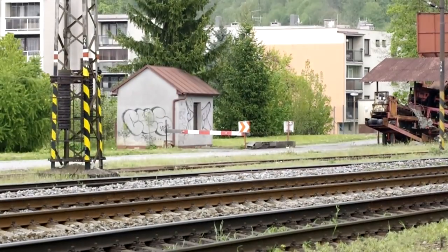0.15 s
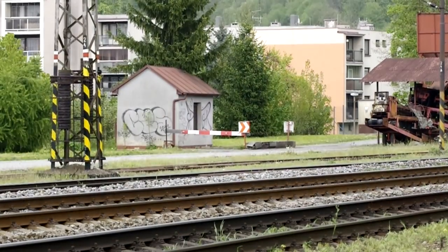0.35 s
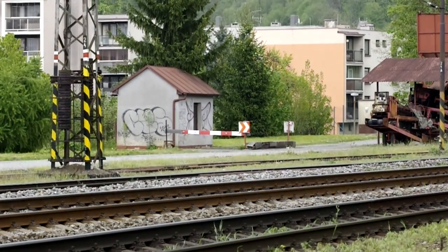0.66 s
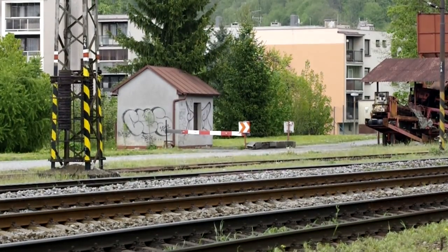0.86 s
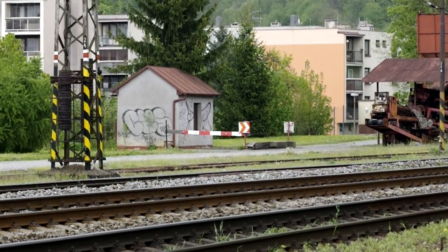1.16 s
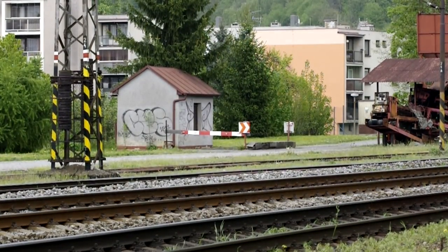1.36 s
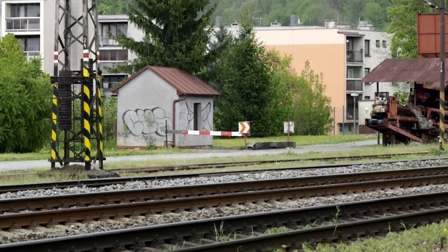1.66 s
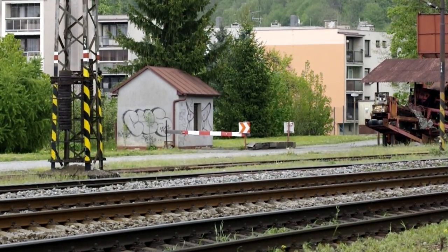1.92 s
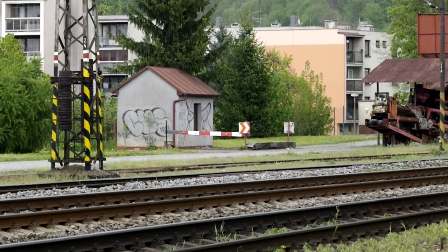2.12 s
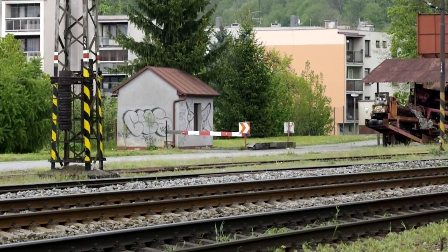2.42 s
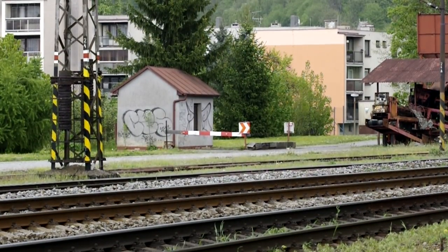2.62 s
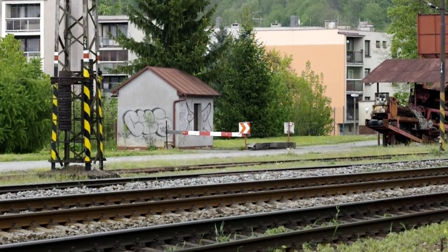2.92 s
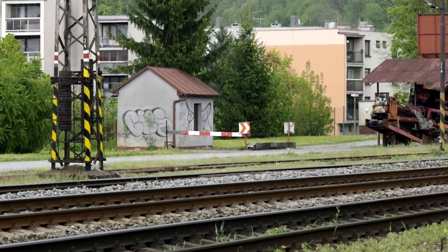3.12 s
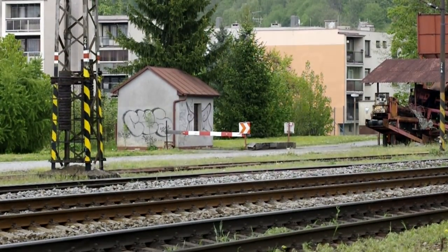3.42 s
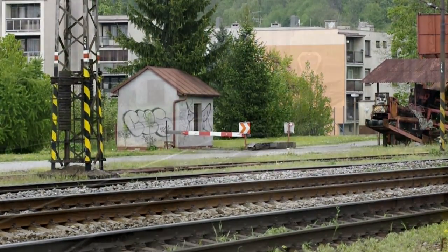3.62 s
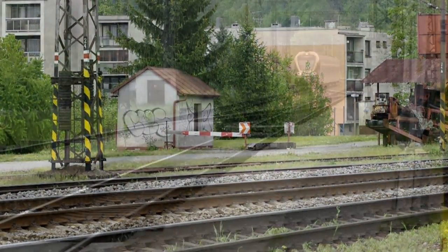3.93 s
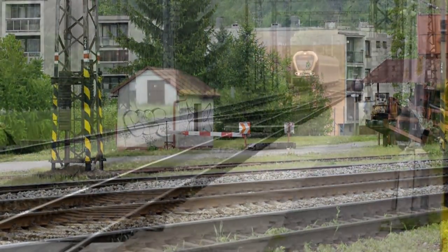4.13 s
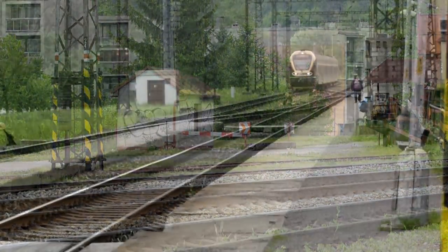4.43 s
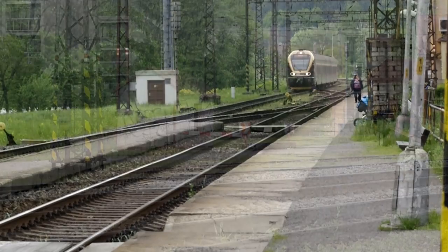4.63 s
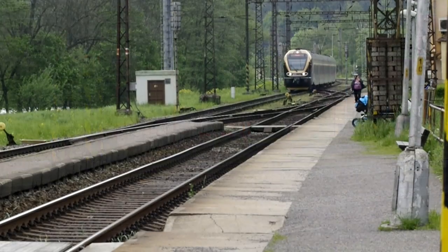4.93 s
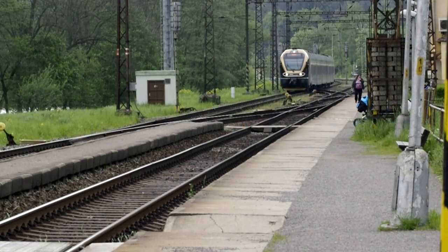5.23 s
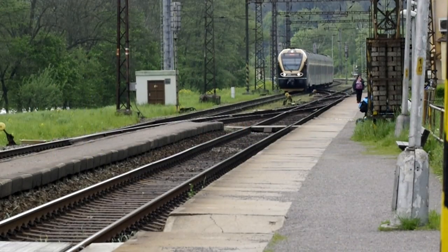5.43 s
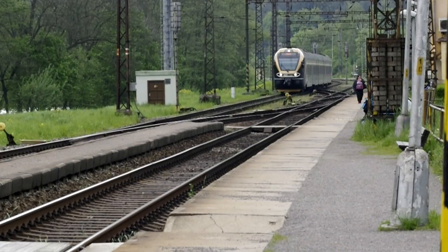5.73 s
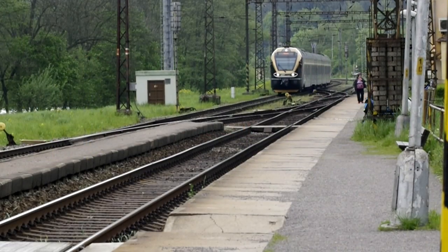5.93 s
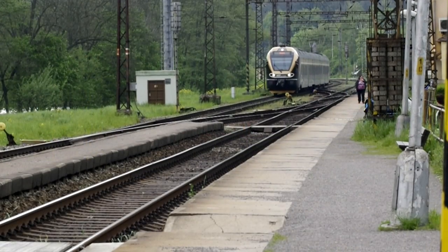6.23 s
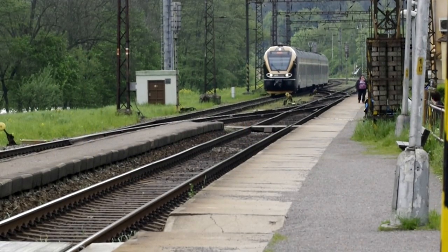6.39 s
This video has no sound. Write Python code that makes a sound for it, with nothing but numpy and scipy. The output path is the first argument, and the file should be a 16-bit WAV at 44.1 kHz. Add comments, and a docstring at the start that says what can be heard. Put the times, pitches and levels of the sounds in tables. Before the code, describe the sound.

Outdoors beside railway tracks, a fast train that has just passed draws away with a rolling roar and rushing air. Over it the rails give a bright, metallic hiss in uneven surges, with light knocks. The roar goes first and the thin ringing lingers, then vanishes. Wind gusts thump low on the exposed microphone, hardest near the end, leaving quiet air.

```python
"""The rolling roar of a fast electric train that has just rushed by recedes under the high ringing hiss of the rails,
which surges as wheel after wheel scrubs the steel. The hiss fades into quiet open air with a few faint birds,
and gusts of wind thump on the microphone. Shaped noise makes roar, air, hiss and wind; resonances ring in the rails;
sines make drones and birds; single swings of pressure make the thumps."""
import sys
import numpy as np
from scipy import signal
from scipy.fft import rfft, irfft, next_fast_len
from scipy.io import wavfile
from scipy.ndimage import uniform_filter1d

SR = 44100
rng = np.random.default_rng(int(sys.argv[2]) if len(sys.argv) > 2 else 0)


def unload_wav(signal):
    """Save mono or channel-first audio to the path in sys.argv[1] as 16-bit WAV at rate SR, clipped to [-1, 1]."""
    wavfile.write(
        sys.argv[1],
        SR,
        np.round(np.clip(np.atleast_2d(signal).T, -1, 1) * 32767).astype(np.int16),
    )


N = 289296
T, HZ = np.arange(N) / SR, np.fft.rfftfreq(N, 1 / SR)

# gusts on the microphone: middle_s, half_length_s, strength_db
GUSTS = [(2.732, 0.025, -45.5), (2.832, 0.014, -38), (2.977, 0.029, -31.5), (3.043, .025, -37),
         (3.141, 0.027, -40), (3.3, 0.085, -49), (3.425, 0.043, -43), (4.37, 0.018, -47),
         (4.55, 0.029, -30.5), (4.664, 0.054, -36), (4.828, 0.033, -33), (4.965, 0.076, -25.5),
         (5.123, .06, -17.5), (5.245, 0.048, -19.5), (5.348, 0.02, -27.5), (5.392, 0.023, -35),
         (5.824, 0.053, -36.5), (5.911, 0.012, -43.5)]


def gain_of(db):
    """Decibels to amplitude."""
    return 10 ** (np.asarray(db) / 20)


def evened(x):
    """Scales to rms 1."""
    return x / np.sqrt(np.mean(x ** 2) + 1e-20)


def shape(points):
    """Gain at every frequency from a short spectrum; it falls steeply above the last point."""
    hz, db = np.transpose(points)
    gain = gain_of(np.interp(np.log(HZ + 1), np.log(hz), db))
    return gain / np.maximum(HZ / hz[-1], 1) ** 10


def ringing(modes):
    """Gain at every frequency of a set of steep-sided resonances, summed in power."""
    power = 0
    for hz, width_hz, db in modes:
        power = power + gain_of(db) ** 2 / (1 + ((HZ - hz) / width_hz) ** 2) ** 2
    return np.sqrt(power)


def slow_gain(rate_hz):
    """Low-pass gain for slow random movement."""
    return 1 / (1 + (HZ / rate_hz) ** 4)


def noise(gain, band_hz=(0, SR)):
    """Noise of a given colour, with rms 1 inside the band."""
    size = next_fast_len(N)
    colour = np.interp(np.fft.rfftfreq(size, 1 / SR), HZ, gain)
    x = irfft(rfft(rng.standard_normal(size)) * colour, size)[:N]
    inside = (HZ >= band_hz[0]) & (HZ <= band_hz[1])
    return evened(x) * np.sqrt(np.sum(gain ** 2) / np.sum(gain[inside] ** 2))


def waver(rate_hz, depth_db):
    """A random gain that moves up to rate_hz times a second."""
    return gain_of(depth_db * noise(slow_gain(rate_hz)))


def level(curve, fall_db_per_s, column=1):
    """Gain along one column of a curve; outside its span it dies away at a steady rate."""
    s, db = np.transpose(curve)[[0, column]]
    outside_s = abs(T - np.clip(T, s[0], s[-1]))
    return gain_of(np.interp(T, s, db) - fall_db_per_s * outside_s)


def swell(middle_s, half_s):
    """A round-topped rise and fall, height 1."""
    return np.exp(-abs((T - middle_s) / half_s) ** 3)


def mottled(x, depth_db, span_hz, span_s):
    """Lays random patches of gain, span_hz wide and span_s long, over a sound."""
    hz, t, z = signal.stft(x, SR, nperseg=1024, noverlap=768)
    across = np.fft.fftfreq(len(hz), hz[1])[:, None]
    along = np.fft.fftfreq(len(t), t[1])
    blur = np.exp(-(across * span_hz) ** 2 - (along * span_s) ** 2)
    grain = np.fft.fft2(rng.standard_normal(z.shape))
    patches = evened(np.fft.ifft2(grain * blur).real)
    return signal.istft(z * evened(gain_of(depth_db * patches)), SR, nperseg=1024, noverlap=768)[1][:N]


def open_air():
    """Outdoor wash; a far train murmurs as it draws near and makes the rails hiss faintly."""
    # wash: freq_hz, db_per_hz
    wash_tone = [(15, -12), (40, -5), (110, 0.5), (200, -1), (300, -6.5), (480, -3.5), (700, -9),
                 (900, -8.5), (1400, -12), (2100, -15.5), (2800, -17), (5300, -19), (6700, -24),
                 (9500, -28), (15500, -45)]
    # rails under the distant train: freq_hz, width_hz, level_db
    far_rail_modes = [(5750, 340, -1.3), (8260, 970, 0.25)]
    # murmur of the distant train: time_s, level_db
    approach = [(5.3, -58.5), (5.9, -55), (6.5, -55.5)]
    # its resonances: freq_hz, width_hz, level_db
    approach_modes = [(209, 92, -0.5), (470, 150, 3.5), (870, 220, -4.5), (2000, 780, -12.5)]
    wash_db, far_rail_db = -52, -62
    wash = gain_of(wash_db) * mottled(noise(shape(wash_tone)), depth_db=1.04, span_hz=199, span_s=0.19)
    murmur = level(approach, fall_db_per_s=10) * noise(ringing(approach_modes)) * waver(9, 1.4)
    far_hiss = gain_of(far_rail_db) * noise(ringing(far_rail_modes))
    return wash + murmur + far_hiss


def birds():
    """Short gliding notes, blurred by scattering among the trees."""
    # middle_s, length_s, pitch_hz, glide_hz_per_s, level_before_blur_db
    chirps = [(0.468, 0.032, 2600, 0, -39), (2.366, 0.05, 2880, -2, -52), (3.427, 0.031, 3000, 4000, -54),
              (4.024, 0.051, 3600, 5000, -51), (6.27, 0.023, 4080, -2000, -59.5)]
    notes = np.zeros(N)
    for s, length_s, hz, glide, db in chirps:
        t = T - s
        envelope = np.exp(-(t / length_s) ** 2)
        notes += gain_of(db) * envelope * np.sin(2 * np.pi * (hz + glide * t / 2) * t)
    return notes * (0.5 + 0.44 * noise(slow_gain(70)))


def gusting():
    """Strength of the wind at the microphone, 0-1; it saturates in the hardest gusts."""
    full_db = -25
    power = sum((gain_of(db) * swell(s, half_s)) ** 2 for s, half_s, db in GUSTS)
    return np.tanh(np.sqrt(power) / gain_of(full_db))


def wind(gust):
    """Turbulence rumbles at the microphone; stronger gusts shed smaller eddies, which flutter higher."""
    # light breeze between the gusts: time_s, level_db
    breeze = [(0.0, -53), (0.68, -56), (0.8, -45.5), (1.65, -56.5), (1.85, -47.5), (2.3, -52),
              (3.65, -48.5), (4.0, -59), (4.13, -46.5), (5.5, -62), (6.1, -58.5), (6.55, -53)]
    # deep rumble: freq_hz, db_per_hz
    rumble_tone = [(15, -2), (45, 3), (70, 2.5), (100, -6), (170, -17.5)]
    # buffeting: freq_hz, db_per_hz
    buffet_tone = [(40, -13), (80, -8.5), (125, 7.5), (165, -7.5), (230, -10.5), (400, -30.5), (900, -56)]
    # flutter: freq_hz, db_per_hz
    flutter_tone = [(100, -6), (200, 7.5), (340, -1), (480, -8.5), (700, -25), (1200, -54), (3000, -62)]
    # a gust's rumble lasts longer and grows less than the gust
    rumble_db, rumble_spread, rumble_growth = -25.5, 2, 0.43
    push_power = 0
    for s, half_s, db in GUSTS:
        push = gain_of(rumble_db + rumble_growth * db) * swell(s, rumble_spread * half_s)
        push_power = push_power + push ** 2
    drive = np.sqrt(level(breeze, fall_db_per_s=9) ** 2 + push_power)
    rumble = drive * noise(shape(rumble_tone)) * waver(13, 1.6)
    buffet = gain_of(-24.0) * gust * noise(shape(buffet_tone)) * waver(22, 1.4)
    flutter = gain_of(-27.0) * gust ** 1.53 * noise(shape(flutter_tone)) * waver(70, 1.8)
    return rumble + buffet + flutter


def small_eddies(gust):
    """Random eddies, as strong as the gust that carries them: rows of middle_s, peak_db, pitch_hz."""
    count, eddies_per_s = 600, 41
    full_gust_db, spread_db = -31.5, 2
    mid_hz, spread_oct = 298, 0.29
    at, chance = rng.integers(0, N, count), rng.random(count)
    size, pitch = rng.standard_normal((count, 2)).T
    db = full_gust_db + spread_db * size + 20 * np.log10(gust[at] + 1e-9)
    rows = np.transpose([T[at], db, mid_hz * 2 ** (spread_oct * pitch)])
    return rows[chance < eddies_per_s * T[-1] / count]  # thins the candidates to the rate


def thumps(eddies):
    """An eddy crossing the microphone pulls and then pushes: one swing of pressure, shorter when it is small."""
    out = np.zeros(N)
    for s, db, hz in eddies:
        near = slice(*np.searchsorted(T, [s - 1 / hz, s + 1 / hz]))
        u = 2 * np.pi * hz * (T[near] - s)
        out[near] += gain_of(db) * u * np.exp((1 - u ** 2) / 2)
    return out


def knocks():
    """Light knocks from the receding running gear, each a short, broad ring smeared by distance."""
    # start_s, level_db, pitch_hz
    knock_rows = [(1.39, -44, 1200), (2.47, -48.5, 1060), (2.59, -50.5, 1800), (2.88, -49, 1280),
                  (3.41, -52.5, 2650)]
    decay_s = 0.017
    out = np.zeros(N)
    for s, db, hz in knock_rows:
        age = np.maximum(T - s, 0) / decay_s
        envelope = np.sqrt(2 * age) * np.exp(0.5 - age)  # height 1
        out += gain_of(db) * envelope * noise(ringing([(hz, hz / 4, 0)]))
    return out


def drones():
    """Tones of running gear and drive: each swells and fades as it goes by, wandering a little in pitch."""
    # middle_s, length_s, pitch_hz, width_hz, level_db
    drone_rows = [(0.18, 0.34, 266, 13, -51.5), (0.976, 0.27, 264, 10.7, -44.5), (1.07, .17, 377, 4, -40.5),
                  (1.7, .22, 452, 30, -48.5), (1.56, 0.069, 3450, 52, -47)]
    out = np.zeros(N)
    for s, length_s, hz, width_hz, db in drone_rows:
        pitch_hz = hz + width_hz / 2 * noise(slow_gain(width_hz))
        tone = evened(np.sin(2 * np.pi * np.cumsum(pitch_hz) / SR))
        out += gain_of(db) * np.exp(-((T - s) / length_s) ** 2) * tone
    return out


def coaches():
    """Roar of wheels and sleepers and air rushing along the coaches, both receding with the train."""
    # roar: time_s, level_db
    roar_curve = [(0.0, -45), (0.23, -39.5), (0.6, -41), (0.65, -46), (0.92, -37), (1.09, -40.5),
                  (1.9, -46), (1.94, -48), (2.85, -52.5)]
    # roar: freq_hz, db_per_hz
    roar_tone = [(20, -22), (55, -13), (100, -5.5), (165, -7.5), (270, -1.5), (400, -2), (520, -0.5),
                 (820, 1.5), (1020, 0), (1350, -8), (2500, -17.5)]
    # rushing air: time_s, level_db
    rush_curve = [(0.0, -41), (0.73, -41.5), (0.95, -37.5), (1.11, -46), (1.32, -44), (1.42, -53.5),
                  (2.85, -53.5)]
    # rushing air: freq_hz, db_per_hz
    rush_tone = [(700, -8.5), (1500, -3), (2500, -2.5), (3300, -1.5), (4800, 1), (6000, 4.5), (9000, -33)]
    burst_s, burst_half_s, burst_db = 1.54, 0.071, -41  # one short, harsh burst in the rush
    roar = mottled(noise(shape(roar_tone), (400, 1300)), depth_db=2.0, span_hz=120, span_s=0.16)
    roar *= level(roar_curve, fall_db_per_s=5.5) * waver(20, 1.0)
    rush = mottled(noise(shape(rush_tone), (1800, 4800)), depth_db=2.0, span_hz=250, span_s=0.14)
    burst = gain_of(burst_db) * swell(burst_s, burst_half_s)
    rush *= np.hypot(level(rush_curve, fall_db_per_s=4.5), burst) * waver(30, 0.57)
    return roar + rush


def rail_echoes(share, decay_s):
    """Waves thrown back by fastenings and welds ripple the spectrum of the rail."""
    echoes = rng.standard_normal(N) * np.exp(-T / decay_s)
    return abs(1 + share * rfft(echoes) / np.linalg.norm(echoes))


def rails():
    """Rough wheel contact drives a broad hiss that dies with distance, and rail resonances that carry far."""
    # scrubbing hiss: freq_hz, db_per_hz
    scrub_tone = [(4000, -25.5), (5200, -16), (5850, 2.5), (6100, -2), (6700, 4.5), (7100, -4.5),
                  (8000, 1.5), (8900, 7.5), (9600, 0.5), (10300, -1.5), (11500, -6), (13000, -30),
                  (15700, -24)]
    # waves that run far along the rail: freq_hz, width_hz, level_db
    song_modes = [(6980, 95, -14), (7240, 190, -6), (7496, 44, 3), (7100, 78, -16), (7744, 67, 6),
                  (7980, 19, 4.5), (8070, 39, 8), (8740, 49, -5), (8296, 50, 7.5), (8500, 16, 0),
                  (8706, 27, 1.5), (8570, 64, -0.5), (8970, 140, -36), (9700, 40, -24), (9590, 83, -6.5)]
    # highest ringing: freq_hz, width_hz, level_db
    top_modes = [(10500, 180, -8.5), (11000, 640, -8), (11400, 110, -3), (11500, 43, 4), (11700, 250, -3),
                 (12280, 280, 2.5), (13270, 450, -1), (13500, 330, -6.5), (14800, 700, -8.5)]
    # steady drive as the train draws away: time_s, scrub_drive_db, song_drive_db, top_drive_db
    drive = [(0.0, -33, -32.5, -45), (1.4, -39.5, -31, -41), (1.8, -42.5, -36, -43),
             (2.2, -45.5, -36.5, -44), (3.7, -50.4, -35, -37.5), (4.3, -57, -31, -40.5),
             (4.5, -64, -34.5, -48), (5.0, -75, -46.5, -50.5), (5.2, -90, -54.5, -70)]
    # a wheel bears harder on the rail: middle_s, half_length_s, scrub_lift_db, song_lift_db, top_lift_db
    surges = [(0.025, .032, 1, 3.5, 1), (0.272, 0.017, -0.5, 6.5, 4), (0.477, .14, 1.5, 1, 6),
              (0.957, .07, 4.5, 1, 2), (1.07, .03, 6, 2, 0), (1.25, .1, 5.5, 3, 3.5),
              (1.345, 0.032, 2, 3, 9), (1.535, .058, 8.5, 6.5, 3.5), (1.658, 0.054, 1, 10, 4),
              (1.879, .042, 8.5, 10.5, 13), (1.944, 0.032, 7, 10, 0), (2.105, 0.12, 10, 10.5, 8),
              (2.36, .11, 7.5, 10, 9.5), (2.519, .06, 6.5, 10.5, 5), (2.658, .06, 6, 13, 5.5),
              (2.784, 0.054, 0.5, 5.5, 8.5), (2.87, 0.045, 2, 9, 3), (2.975, .08, 1.5, 2, 8.5),
              (3.178, .11, 3.5, 8.5, 5), (3.422, 0.15, 2.5, 6.5, 1.5), (3.878, 0.084, 1.5, 5, -2.5),
              (3.95, .07, .5, 1, 6), (4.236, .08, 1.5, 1, 1)]
    scrub_level_db, song_level_db, top_level_db = -0.5, 0.36, -0.4  # overall loudness of each layer
    ripple = rail_echoes(share=0.34, decay_s=0.024)
    scrub = noise(shape(scrub_tone) * np.sqrt(ripple), (5500, 6900))
    song = noise(ringing(song_modes) * ripple ** 0.25, (7300, 8800))
    top = noise(ringing(top_modes) * ripple, (11000, 15500))
    scrub = mottled(scrub, depth_db=2.0, span_hz=715, span_s=0.067)  # the contact patch wanders over the tread
    scrub_db, song_db, top_db = sum(np.outer(lifts, swell(s, half_s)) for s, half_s, *lifts in surges)
    scrub *= gain_of(scrub_db + scrub_level_db) * level(drive, fall_db_per_s=86, column=1) * waver(22, 0.79)
    song *= gain_of(song_db + song_level_db) * level(drive, fall_db_per_s=400, column=2) * waver(23, 1.0)
    top *= gain_of(top_db + top_level_db) * level(drive, fall_db_per_s=400, column=3) * waver(25, 0.99)
    return (scrub + song + top) * waver(46, 0.65)  # the roughness of the tread shakes all three together


def scene():
    """Train, rails, birds and wind in the open."""
    # the largest eddies that thump the microphone: middle_s, peak_db, pitch_hz
    large_eddies = [(2.947, -23, 151), (2.961, -27, 380), (2.9947, -20, 257), (4.538, -29, 205),
                    (4.788, -25.5, 278), (4.910, -18.5, 200), (4.9935, -24, 149), (5.015, -9.5, 167),
                    (5.0155, -25, 810), (5.024, -17, 260), (5.067, -15, 177), (5.105, -16.5, 316),
                    (5.131, -11, 126), (5.158, -12.5, 193), (5.205, -8, 336), (5.237, -20, 318),
                    (5.274, -30, 420), (5.288, -17, 140), (5.351, -23.5, 200), (5.832, -22.5, 198),
                    (5.862, -29, 237)]
    gust = gusting()
    train = coaches() + drones() + knocks() + rails()
    gusts = wind(gust) + thumps(large_eddies) + thumps(small_eddies(gust))
    return (train + birds() + open_air() + gusts)[None]


def record(dry):
    """Gain control ducks the loudest moments and recovers steadily; then a low-pass sets the band limit."""
    threshold_db, recovery_db_per_s, share = -19, 35, 0.57
    attack_s, edge_hz = 0.008, 15700
    power_db = 10 * np.log10(abs(uniform_filter1d(dry[0] ** 2, size=200)) + 1e-12)
    fall_db = recovery_db_per_s * T
    held_db = np.maximum.accumulate(power_db + fall_db) - fall_db  # peak hold that sinks at the recovery rate
    over_db = np.maximum(held_db - threshold_db, 0)
    lag = np.exp(-1 / (attack_s * SR))
    ducked = dry / gain_of(share * signal.lfilter([1 - lag], [1, -lag], over_db))
    lowpass = signal.firwin(611, edge_hz, window=("kaiser", 9), fs=SR)
    return signal.oaconvolve(ducked, lowpass[None], "same")


dry = scene()
out = record(dry)
unload_wav(out)
```